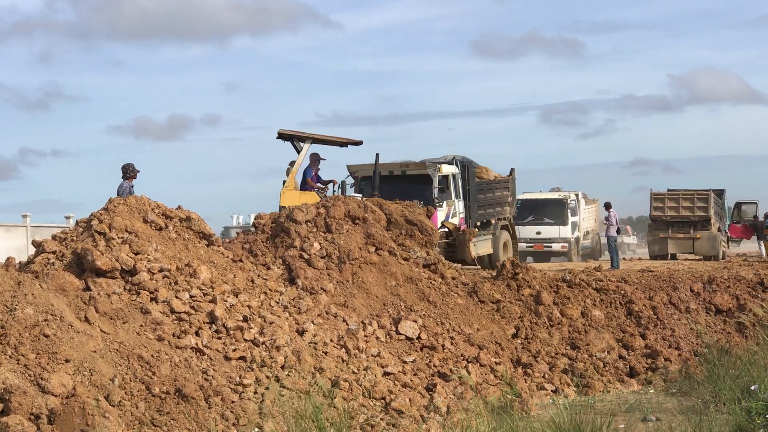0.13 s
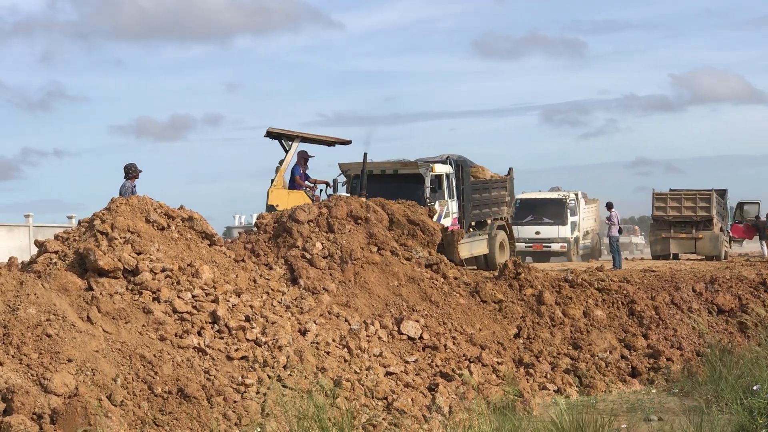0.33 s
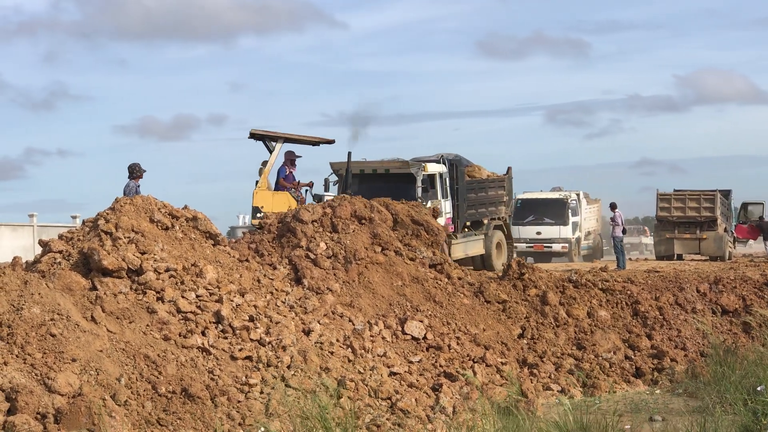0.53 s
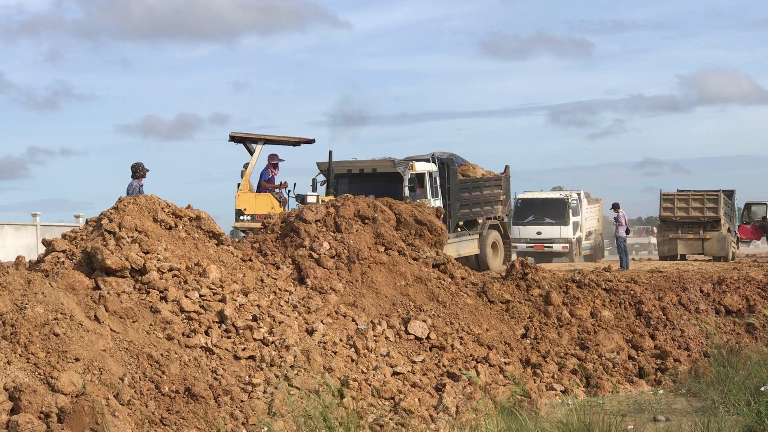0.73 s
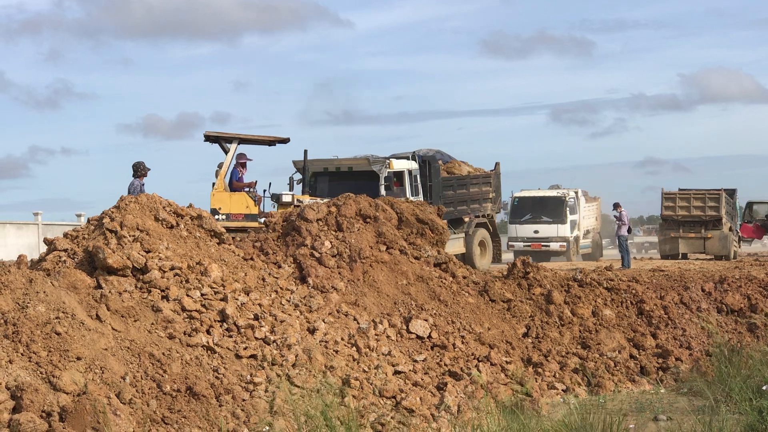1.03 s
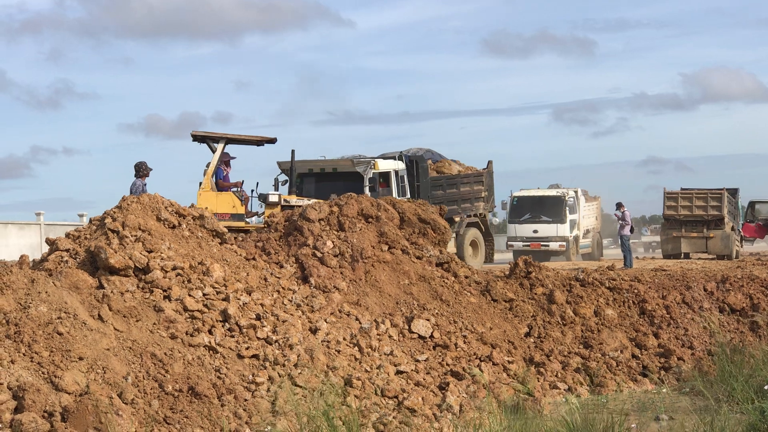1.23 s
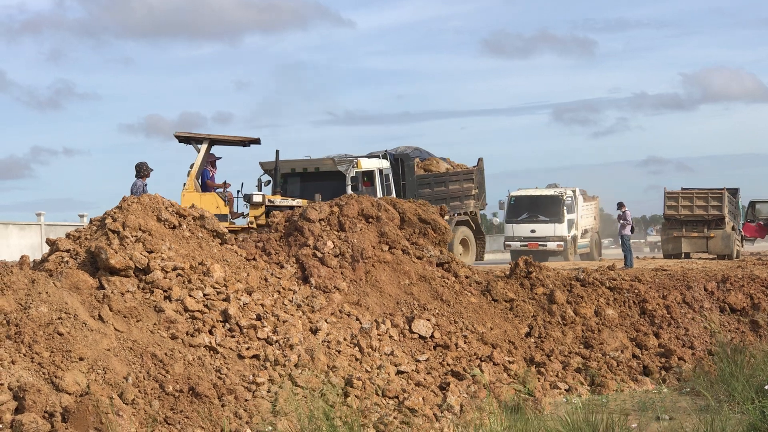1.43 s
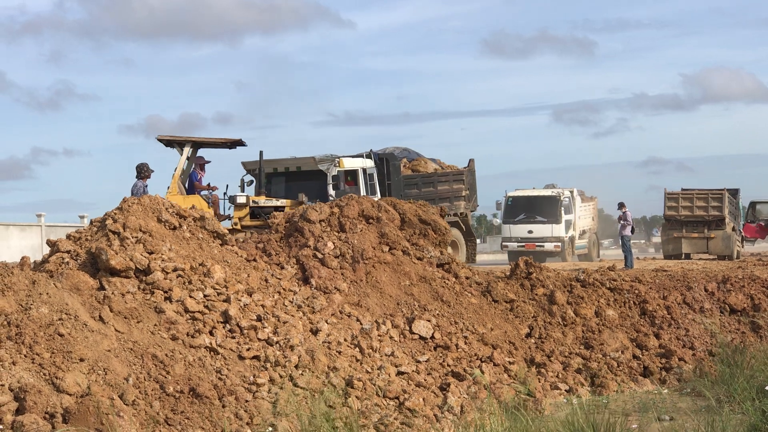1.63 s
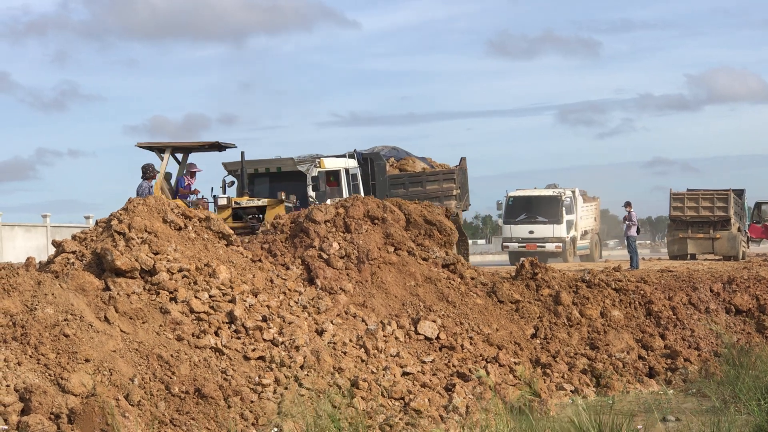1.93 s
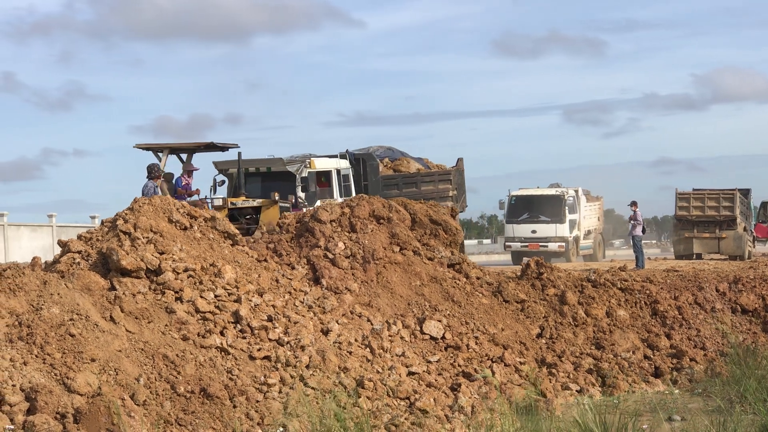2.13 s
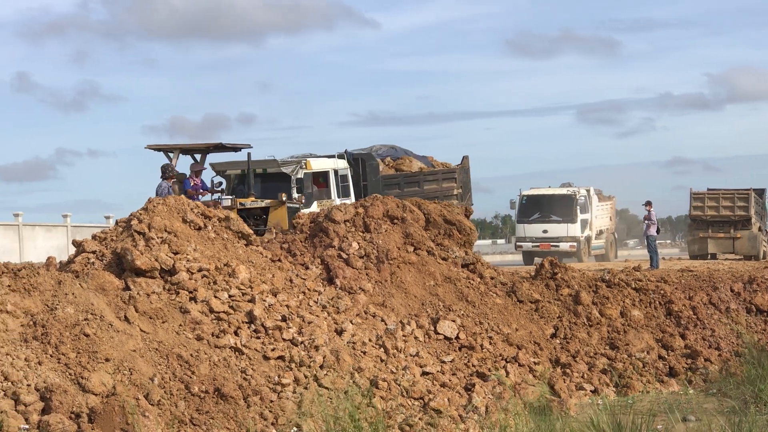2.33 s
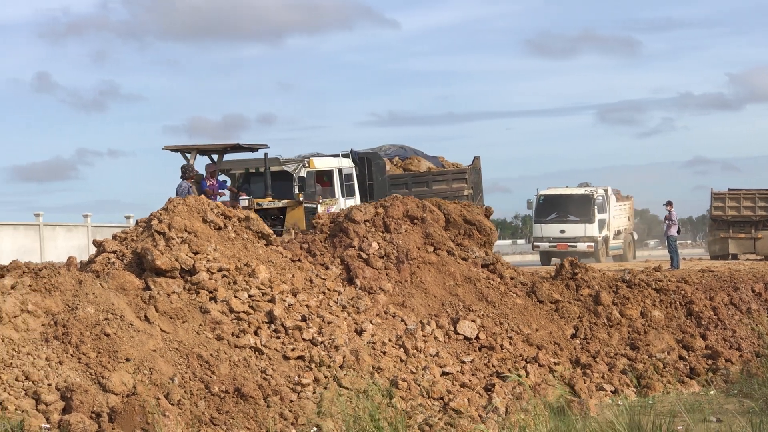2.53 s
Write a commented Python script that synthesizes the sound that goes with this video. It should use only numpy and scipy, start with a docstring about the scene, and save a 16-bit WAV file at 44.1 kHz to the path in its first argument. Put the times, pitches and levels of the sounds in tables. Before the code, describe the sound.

A dump truck's diesel engine throbs and clatters throughout, some way off outdoors, over the rumble of idling machines. A bulldozer's hum rises slightly and fades after about 1 second. The truck body knocks heavily at 0.4 seconds. Steel tracks clank and clink from 0.5 to 1.8 seconds, with dull thuds around 1 second and thin squeals near 0.6 and 1.9. A lighter ringing knock comes at 2.5 seconds.

```python
"""A low exhaust throb comes first: a loaded dump truck crawling past a bulldozer, some way off
behind a bank of earth. Diesel clatter swells with each firing of the truck's six cylinders.
Steel tracks clank, clink and squeal, the truck body knocks and rings, and the load thuds.
Other trucks idle under a bed of rumble and fan roar. One microphone, out in the open."""
import sys
import numpy as np
from scipy import signal
from scipy.fft import rfft, irfft
from scipy.io import wavfile
from scipy.ndimage import uniform_filter1d

SR = 44100
rng = np.random.default_rng(int(sys.argv[2]) if len(sys.argv) > 2 else 0)


def file_out(sig):
    """Save sig as 16-bit WAV at sys.argv[1]."""
    # one column per channel
    cols = np.atleast_2d(sig).T
    # limit, then scale
    lim = np.clip(cols, -1, 1)
    pcm = np.round(lim * 32767).astype(np.int16)
    wavfile.write(sys.argv[1], SR, pcm)


N = 118629
T = np.arange(N) / SR

# Colours of the noises at the microphone. Each row: frequency in Hz, relative level in dB.
RUMBLE_COLOUR = [(22, -44), (33, -8), (45, -10), (75, 0.5), (110, -2), (150, -3.5), (190, -9.5), (250, -18),
                 (500, -58)]
FAN_COLOUR = [(120, 10), (270, -6.5), (330, 2), (380, 3), (430, -1), (560, 0), (800, -2.5), (980, -1.5),
              (1100, -5.5), (1330, -1.5), (1700, -6.5), (2100, -6), (3000, -14.5), (6000, -28.5),
              (15000, -45)]
CLANK_COLOUR = [(600, -2), (1400, -1), (2100, 7), (3000, -0.5), (5200, -2), (7800, -7), (10000, -13),
                (15500, -32)]
CLINK_COLOUR = [(4000, -39), (7800, 1), (10000, -12), (11300, 7.5), (12400, -0.5), (13400, 5),
                (15500, -4.5)]
RATTLE_COLOUR = [(700, -5), (950, -5.5), (1350, -3), (2500, -24), (6000, -48)]
KNOCK_COLOUR = [(200, -58), (480, 7), (800, 0), (1700, 4), (4000, -5), (6500, -2.5), (9000, -10),
                (15500, -25)]
THUD_COLOUR = [(200, -18), (520, -0.5), (750, -9), (1300, -13), (5000, -50)]
CLATTER_COLOUR = [(700, -5), (1500, -3.5), (2050, -3.5), (2350, -2), (2650, -0.5), (3300, 0), (3900, -3),
                  (5000, -8.5), (6300, -10), (8500, -14), (10300, -17.5), (11800, -18), (15500, -22)]
# Rise and fall of the running noises. Each row: time in seconds, level in dB.
RUMBLE_LEVEL = [(0, -38), (.45, -37), (.8, -46), (1.1, -39.5), (1.4, -36), (1.65, -38), (1.8, -45),
                (2.15, -40.5), (2.69, -48)]
FAN_LEVEL = [(0, -43.5), (.36, -44.5), (.9, -43.5), (1.14, -44), (1.45, -44), (1.85, -45), (2.2, -46),
             (2.69, -46.5)]
CLATTER_LEVEL = [(0, -53), (.42, -52.5), (.63, -50), (.8, -52), (1, -53.5), (1.27, -50.5), (1.42, -53),
                 (1.68, -53.5), (1.98, -48.5), (2.2, -50.5), (2.69, -50.5)]
# Bulldozer exhaust. Each row: time in seconds, firing rate in Hz, level in dB.
DOZER_EXHAUST = [(0, 97.2, -28), (.1, 99.7, -38), (.24, 102.4, -34), (.32, 108.3, -45), (.55, 111.9, -41),
                 (.8, 113, -40.5), (1.1, 106.5, -56), (1.4, 101, -50), (2.69, 100.3, -56)]
# Track links striking. Each row: start in seconds, clank level in dB, clink level in dB.
LINKS = [(.11, -52, -63), (0.555, -44.5, -52.5), (0.598, -46.5, -59), (0.698, -46, -63), (0.853, -48, -60),
         (0.942, -45.5, -46.5), (.992, -51.5, -57), (1.034, -44, -45.5), (1.077, -46.5, -55),
         (1.137, -46.5, -54), (1.175, -48, -56), (1.223, -46, -47.5), (1.268, -46.5, -57),
         (1.303, -49, -63), (1.335, -49, -53), (1.432, -66, -59), (1.577, -55, -71), (1.691, -52, -53),
         (1.755, -49, -71), (2.531, -62, -55), (2.577, -61, -59)]
# Loose track plates. Each row: start in seconds, hold in seconds, level in dB.
RATTLES = [(.05, .12, -51.5), (0.364, .01, -49), (1.138, 0.027, -54), (1.39, 0.039, -53),
           (1.482, 0.034, -49.5), (1.571, 0.052, -56), (1.682, 0.017, -50.5)]
# Tracks scraping. Each row: start and length in seconds, first pitch, last pitch and waver in Hz,
# level in dB.
SCRAPES = [(0.517, .21, 2070, 2120, 102.4, -52.5), (0.566, .17, 3285, 3350, 121, -54.5),
           (1.653, 0.0818, 800.5, 908, 11, -51.5), (1.802, 0.32, 3189, 3200, 220, -56.5)]
# Rollers, plates and panels. Each row: start in seconds, pitch in Hz, level in dB, decay in seconds.
RINGS = [(.461, 3320, -49, 0.019), (0.85, 2051, -46.5, 0.022), (.942, 2037, -39.5, 0.01),
         (1.169, 2040, -50, .016), (1.268, 2100, -51, 0.012), (1.308, 2580, -45.5, 0.028),
         (1.538, 3505, -48.5, 0.018), (1.574, 2570, -48.5, 0.038), (2.529, 483.7, -43, 0.032)]
# Heavy knocks of the truck body. Each row: start in seconds, level in dB, hold in seconds.
KNOCKS = [(0.391, -39.5, 0.002), (0.399, -39.5, 0.0033), (2.527, -44.5, 0.011)]
# Its panels. Each row: pitch in Hz, level in dB against the knock, decay in seconds.
BODY_MODES = [(547, -10.5, 0.021), (1073, -13, 0.035), (1425, -13, 0.039), (1803, -8, 0.014)]
# Earth and load shifting. Each row: start in seconds, level in dB.
THUDS = [(.395, -48), (0.981, -48.5), (1.11, -47.5)]
# Truck exhaust. Each row: time in seconds, firing rate in Hz, levels of the firing tone and of its
# octave in dB before a slight lift.
TRUCK_EXHAUST = [(0, 62.75, -34.5, -39), (.11, 63.6, -30, -42.5), (.21, 64.9, -32.5, -36),
                 (.34, 60.84, -32.5, -45), (.39, 61.1, -24.5, -36), (.53, 60.6, -28.5, -48),
                 (.66, 63.05, -27.5, -43.5), (.95, 66.26, -33.5, -41), (1.015, 68, -41.5, -35.5),
                 (1.11, 64, -28.5, -40.5), (1.18, 65.84, -43, -46), (1.26, 61.5, -30.5, -32.5),
                 (1.35, 62.4, -30, -41.5), (1.64, 65.23, -31, -37), (1.79, 63.1, -34.5, -32.5),
                 (1.9, 62.3, -33, -43), (2.03, 63.8, -31.5, -36.5), (2.11, 68.73, -31, -37.5),
                 (2.21, 68.27, -36.5, -37), (2.69, 67.94, -34, -40.5)]
# Weaker tones of unequal cylinders. Each row: order of the two-turn cycle, level in dB against the
# smoothed firing level.
TRUCK_ORDERS = [(5, -25), (7, -23.5), (9, -21.5), (15, -21.5), (18, -28), (36, -30)]

PANEL_RIPPLE_DB = 1.7


def undb(db):
    """Decibels to gain."""
    return 10 ** (np.asarray(db) / 20)


def unit(x):
    """Scale to rms 1."""
    return x / np.sqrt(np.mean(x ** 2))


def curve(table, column):
    """One column of a table, joined by straight lines in time."""
    rows = np.array(table)
    return np.interp(T, rows[:, 0], rows[:, column])


def walk(rate):
    """A smooth random drift of rms 1 that moves about rate times a second."""
    hz = np.arange(N // 2 + 1) * SR / N
    return unit(irfft(rfft(rng.standard_normal(N)) / (1 + (hz / rate) ** 4), N))


def noise(colour, ripple_db=0):
    """Coloured noise of rms 1; ripple_db adds narrow resonances at random pitches."""
    hz = np.arange(N // 2 + 1) * SR / N + 1e-3
    rows = np.array(colour)
    db = np.interp(np.log(hz), np.log(rows[:, 0]), rows[:, 1])
    db -= 24 * np.maximum(np.log2(rows[0, 0] / hz), 0)  # 24 dB an octave below the first row
    ripple = np.interp(np.sqrt(hz), np.linspace(0, np.sqrt(SR / 2), 260), rng.standard_normal(260))
    return unit(irfft(rfft(rng.standard_normal(N)) * undb(db + ripple_db * ripple), N))


def blow(start, attack, hold, decay):
    """Envelope of a blow: rise, hold and exponential decay, all in seconds."""
    age = T - start
    return np.clip(age / attack, 0, 1) * np.exp(-np.clip((age - attack - hold) / decay, 0, 20))


def ring(hz):
    """A rough, slightly wandering tone of struck steel."""
    rough = 1 + 0.5 * (walk(120) + 1j * walk(120))
    return unit((rough * np.exp(2j * np.pi * hz * T)).real)


def site():
    """The bed of the place: waiting trucks idle, fans and engine blocks roar, moving machines rumble."""
    idle_hz = 49.4 * (1 + 0.034 * walk(4.1))
    idle = np.sqrt(2) * undb(-44.5 + 2 * walk(3.7)) * np.sin(2 * np.pi * np.cumsum(idle_hz) / SR)
    roar = noise(FAN_COLOUR, PANEL_RIPPLE_DB) * undb(curve(FAN_LEVEL, 1) + 0.67 * walk(44))
    rumble = noise(RUMBLE_COLOUR) * undb(curve(RUMBLE_LEVEL, 1))
    return idle + roar + rumble


def bulldozer():
    """Behind the bank, an exhaust hums at its firing rate, speeding up, then sinking and fading."""
    firing_hz = curve(DOZER_EXHAUST, 1) * (1 + 0.021 * walk(14.3))
    level = undb(curve(DOZER_EXHAUST, 2) + 2 * walk(8.8))
    return np.sqrt(2) * level * np.sin(2 * np.pi * np.cumsum(firing_hz) / SR)


def tracks():
    """Steel on steel: links clank and clink, loose plates rattle, scrapes squeal, struck parts ring."""
    out = np.zeros(N)
    for start, clank_db, clink_db in LINKS:
        for db, colour, decay in (clank_db, CLANK_COLOUR, 0.026), (clink_db, CLINK_COLOUR, 0.013):
            strike = blow(start, attack=0.004, hold=0.0024, decay=decay)
            out += undb(db) * strike * noise(colour, ripple_db=5.5)
    for start, hold, db in RATTLES:
        shake = blow(start, attack=0.0088, hold=hold, decay=0.012)
        out += undb(db + 3.5 * walk(70)) * shake * noise(RATTLE_COLOUR, PANEL_RIPPLE_DB)
    for start, length, first_hz, last_hz, waver_hz, db in SCRAPES:
        hz = np.interp(T, [start, start + length], [first_hz, last_hz]) + waver_hz * walk(237)
        held = np.clip(np.minimum(T - start, start + length - T) / 0.027, 0, 1)  # 27 ms fades
        out += undb(db + walk(27)) * held * unit(np.sin(2 * np.pi * np.cumsum(hz) / SR))
    for start, hz, db, decay in RINGS:
        out += undb(db) * blow(start, attack=0.0042, hold=0, decay=decay) * ring(hz)
    return out


def bodywork():
    """The truck body knocks and its panels ring on; shifting earth and load give dull thuds."""
    out = np.zeros(N)
    attack = 0.0014
    for start, db, hold in KNOCKS:
        out += undb(db) * blow(start, attack, hold, decay=0.015) * noise(KNOCK_COLOUR, ripple_db=1.2)
        for hz, mode_db, decay in BODY_MODES:
            out += undb(db + mode_db) * blow(start, attack, hold, decay) * ring(hz)
    for start, db in THUDS:
        out += undb(db) * blow(start, attack=0.0093, hold=0.032, decay=0.035) * noise(THUD_COLOUR)
    return out


def truck():
    """A six-cylinder diesel some way off: the exhaust throbs and the clatter jumps at each firing."""
    lift_db, flutter_db = 0.5, 0.5
    firing_hz = curve(TRUCK_EXHAUST, 1) * (1 + 0.0046 * walk(17.7))
    firing_db, octave_db = curve(TRUCK_EXHAUST, 2), curve(TRUCK_EXHAUST, 3)
    firings = np.cumsum(firing_hz) / SR
    angle = 2 * np.pi * firings
    exhaust = undb(firing_db + lift_db + flutter_db * walk(48)) * np.cos(angle)
    exhaust += undb(octave_db + lift_db + flutter_db * walk(13)) * np.cos(2 * angle)
    cycle = angle / 6  # six firings to two turns of the crank
    smoothed_db = uniform_filter1d(firing_db, int(0.45 * SR))
    for order, db in TRUCK_ORDERS:
        exhaust += undb(smoothed_db + db + 3 * walk(2.8)) * np.sin(order * cycle + 2 * np.pi * rng.random())
    depth, decay_firings = 0.52, 0.52
    bursts = unit(1 + depth * np.exp(-(firings % 1) / decay_firings))
    clatter = bursts * noise(CLATTER_COLOUR, PANEL_RIPPLE_DB) * undb(curve(CLATTER_LEVEL, 1) + walk(29))
    return np.sqrt(2) * exhaust + clatter


def scene():
    """All the machines in mono, from one spot in the open."""
    return (site() + bulldozer() + tracks() + bodywork() + truck())[None]


def record(dry):
    """The recorder cuts the top steeply above 15750 Hz."""
    return signal.sosfilt(signal.ellip(12, .2, 80, 15750, fs=SR, output="sos"), dry)


dry = scene()
out = record(dry)
file_out(out)
```